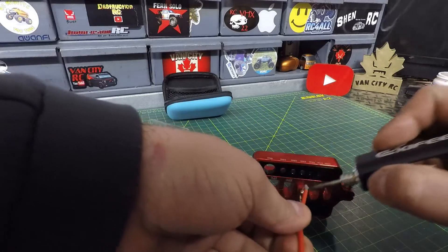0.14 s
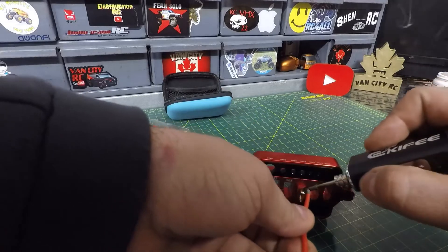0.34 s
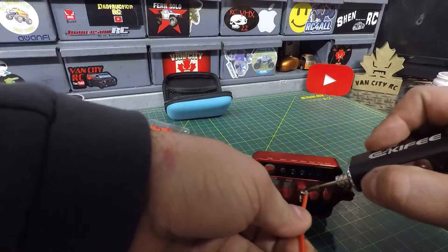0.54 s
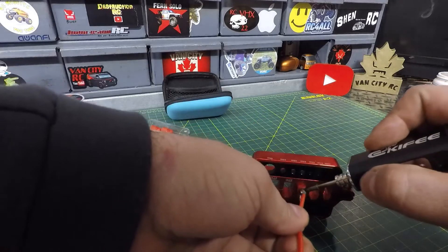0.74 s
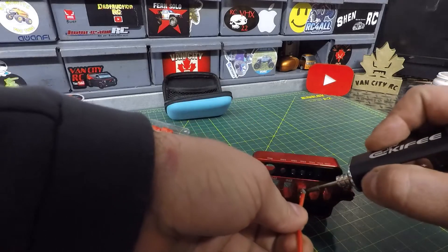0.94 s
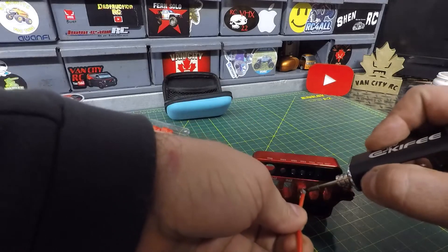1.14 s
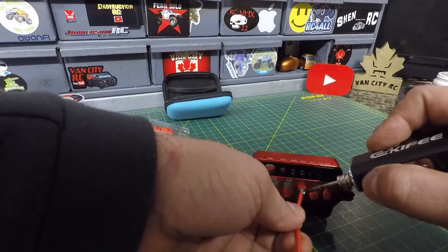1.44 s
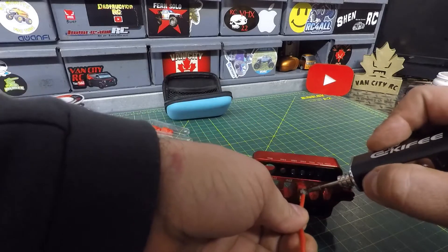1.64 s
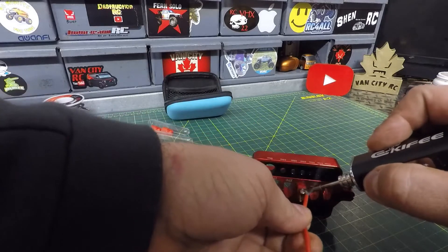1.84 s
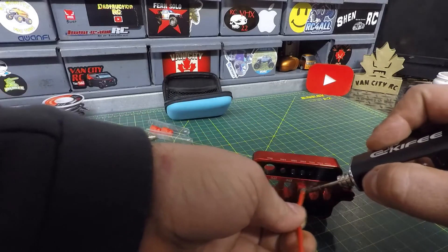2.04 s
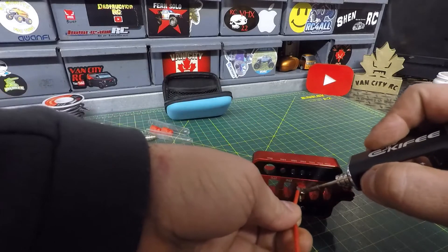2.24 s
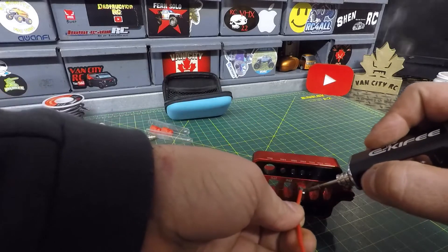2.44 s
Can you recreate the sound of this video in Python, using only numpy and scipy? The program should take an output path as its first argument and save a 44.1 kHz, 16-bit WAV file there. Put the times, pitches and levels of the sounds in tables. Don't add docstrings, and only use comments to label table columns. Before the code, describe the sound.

Dull, low bench thumps from a soldering iron tip nudging a joint, close and mostly right. Quiet hiss and a fading deep sway open; a strong knock with faint bright ticks comes at 0.2 seconds. Soft irregular bumps and trembling follow, with faint flux sizzle from 1.5 to 1.9. Firmer thumps land at 1.9 and 2.1; a last knock with a short rattly ring at 2.26 settles into quiet.

```python
import sys
import numpy as np
from scipy import signal
from scipy.fft import rfft, irfft
from scipy.io import wavfile
from scipy.ndimage import uniform_filter1d

SR = 44100
rng = np.random.default_rng(int(sys.argv[2]) if len(sys.argv) > 2 else 0)


def to_wav(s):
    ch = np.atleast_2d(s).T
    pcm = np.round(np.clip(ch, -1, 1) * 32767)
    wavfile.write(sys.argv[1], SR, pcm.astype(np.int16))


def volts_from_db(level):
    exponent = np.asarray(level, float) / 20
    return 10 ** exponent


N = 114660


def evened(x):
    return x / np.sqrt(np.mean(x ** 2) + 1e-20)


def read_curve(points, hz):
    f, value = np.transpose(points)
    return np.interp(np.log(hz + 1), np.log(f + 1), value)


def level(points):
    s, db = np.transpose(points)
    return volts_from_db(np.interp(np.arange(N) / SR, s, db, left=-200, right=-200))


def colour(x, gain):
    return irfft(rfft(x) * gain(np.fft.rfftfreq(N, 1 / SR)), N)


def add(mix, s, sound):
    part = mix[:, round(s * SR):][:, :sound.shape[1]]
    part += sound[:, :part.shape[1]]


# f/Hz, right level/dB, left level/dB, time to fall 60 dB t/s,
# right polarity, left polarity
BENCH_MODES = [(158.4, -6, -24.5, 0.28, 0.89, -1.04), (194.04, 2.5, -26, 0.22, 0.99, 0.9),
               (221, -15, -25, 0.074, -0.5, -1.58), (267.3, -21.5, -40.5, 0.26, 1, -0.93),
               (341, -14, -24.5, 0.041, 1, 1)]


def bench_ring(vary_db, rise_s, left_db=0):
    t = np.arange(SR // 2) / SR
    ring = np.zeros((2, len(t)))
    for (hz, right_db, left_mode_db, t60, right_sign, left_sign), v in zip(BENCH_MODES, vary_db):
        sign = np.array([[left_sign], [right_sign]])
        ports_db = np.array([[left_mode_db + left_db], [right_db]])
        ring += sign * volts_from_db(ports_db + v - 60 * t / t60) * np.sin(2 * np.pi * hz * t)
    return ring * np.sin(np.pi / 2 * np.minimum(t / rise_s, 1)) ** 2


# t/s, peak level/dB
NUDGES = [(0.202, -15), (0.329, -33), (0.364, -41), (0.416, -37.5), (0.518, -39), (0.593, -32),
          (0.667, -38), (0.74, -40.5), (0.776, -35), (0.847, -27.5), (0.988, -25), (1.054, -39),
          (1.091, -31), (1.13, -36), (1.2, -40), (1.261, -28.5), (1.351, -27), (1.429, -38), (1.463, -27.5),
          (1.561, -39), (1.609, -44), (1.65, -43), (1.714, -32), (1.804, -50), (1.912, -19), (1.969, -27.5),
          (2.056, -30), (2.103, -20.5), (2.186, -33.5), (2.222, -26.5)]
# t/s, level/dB
TREMOR = [(.17, -74), (.25, -65), (.5, -45), (.9, -47.5), (1.15, -42), (1.5, -46), (1.8, -44.5), (2.0, -49),
          (2.3, -52), (2.36, -65)]
# t/s, level/dB
RELEASE = [(0, 1.5), (2.315, 1), (2.335, -9.5), (2.6, 1)]
LEAD_S, PUSH_S = 0.01297, 0.019
BENCH_DB, VARY_DB = 6, 0.8
CHOKE_DB, CHOKE_S = -9.5, 0.012
LIFT_S, LIFT_DB, LIFT_LEFT_DB, LIFT_RISE_S = 2.26, -12.5, 5, 0.019
SHAKES_PER_S, LOW_CUT_HZ = 150, 148


def choke(ringing, start_s):
    t = np.arange(N) / SR
    return ringing * volts_from_db(CHOKE_DB * np.clip((t - start_s) / CHOKE_S, 0, 1))


def bench():
    out, even = np.zeros((2, N)), np.zeros(len(BENCH_MODES))
    variations = VARY_DB * rng.standard_normal((len(NUDGES), len(BENCH_MODES), 2))
    for (s, db), vary_db in zip(NUDGES, variations):
        out = choke(out, s - LEAD_S)
        add(out, s - LEAD_S, volts_from_db(db + BENCH_DB) * bench_ring(vary_db[:, :, None], PUSH_S))
    out = choke(out, LIFT_S)
    add(out, LIFT_S, volts_from_db(LIFT_DB) * bench_ring(even, LIFT_RISE_S, LIFT_LEFT_DB))

    ring = bench_ring(even, PUSH_S)
    ring = ring / np.linalg.norm(ring[1])
    shakes = rng.standard_normal(N) * (rng.random(N) < SHAKES_PER_S / SR)
    shakes = shakes * np.sqrt(SR / SHAKES_PER_S) * level(TREMOR)
    out += signal.oaconvolve(shakes[None], ring, axes=1)[:, :N]
    released = out * [np.ones(N), level(RELEASE)]
    return colour(released, lambda f: f ** 8 / (f ** 8 + LOW_CUT_HZ ** 8))


# f/Hz, level/dB, time to fall 60 dB t/s
JIG_MODES = [(400, -0.5, 0.061), (617, 2.5, 0.088), (693, 0.5, 0.094), (844, -0.5, 0.032),
             (1000, 3.5, 0.029), (1136, -2.5, 0.045), (1400, -13, 0.036)]
JIG_S, JIG_DB, JIG_RIGHT_DB, JIG_RISE_S = 2.264, -32, 5, 0.0048


def jig():
    out, t = np.zeros((2, N)), np.arange(SR // 4) / SR
    ring = sum(volts_from_db(db - 60 * t / t60) * np.sin(2 * np.pi * hz * t) for hz, db, t60 in JIG_MODES)
    ring = ring * np.minimum(t / JIG_RISE_S, 1)
    add(out, JIG_S, volts_from_db(JIG_DB) * ring * np.array([[1], [-volts_from_db(JIG_RIGHT_DB)]]))
    return out


# t/s, level/dB, f/Hz
TICKS = [(.19, -54, 5800), (.195, -53, 4160), (.199, -55, 5260), (.204, -55, 4600), (.633, -61, 4900),
         (0.646, -59, 6500), (.845, -63, 5000)]


def solder_ticks():
    out, t = np.zeros((2, N)), np.arange(SR // 4) / SR
    t60 = 0.019
    for s, db, hz in TICKS:
        add(out, s, volts_from_db(db - 60 * t / t60) * np.sin(2 * np.pi * hz * t) * np.ones((2, 1)))
    return out


# t/s, level/dB
FLUX = [(1.46, -81), (1.51, -62), (1.57, -60), (1.62, -55), (1.69, -57), (1.72, -64), (1.86, -60),
        (1.9, -59.5), (1.945, -72)]
# f/Hz, level/dB
FLUX_COLOUR = [(1500, -12), (3000, -9.5), (4500, -3.5), (6000, 0.5), (7500, -7.5), (10000, -4.5),
               (13000, -8.5), (15000, -11)]
# f/Hz, left minus right level/dB
FLUX_PAN = [(3000, -5), (5000, 2), (7500, 11.5), (10000, 0), (14000, 1)]
# f/Hz, likeness (0 to 1)
FLUX_SAME = [(2500, 0.5), (4200, .95), (5500, 0.46), (8000, 0.1), (14000, 0.1)]
# f/Hz, width f/Hz, level/dB
FLUX_PEAKS = [(7470, 180, 8), (8950, 120, 8.5), (5960, 200, 3), (12400, 500, 3)]
BUBBLES_PER_S, BUBBLE_SPREAD_DB, SPIT_DB, SPIT_S = 4000, 2.5, 0.5, 0.0049


def flux_peaks_db(f):
    return sum(db / (1 + ((f - hz) / width) ** 2) for hz, width, db in FLUX_PEAKS)


def flux():
    out = np.zeros((2, N))
    spit = uniform_filter1d(rng.standard_normal(N), round(SPIT_S * SR))
    spit = volts_from_db(SPIT_DB * evened(spit))
    pitches = np.geomspace(1500, 15000, num=24)
    for hz in pitches:
        t = np.arange(round(4.0 * SR / hz)) / SR
        bubble = np.hanning(len(t)) * np.sin(2 * np.pi * hz * t)
        bubble = bubble / np.linalg.norm(bubble)
        size = volts_from_db(BUBBLE_SPREAD_DB * np.minimum(rng.exponential(1, (3, N)), 4))
        size = size * (rng.random((3, N)) < BUBBLES_PER_S / len(pitches) / SR)
        same = np.clip(read_curve(FLUX_SAME, hz), 0, 1)
        bursts = spit * (np.sqrt(same) * size[0] + np.sqrt(1 - same) * size[1:])
        sizzle = signal.oaconvolve(bursts, bubble[None], axes=1)[:, :N]
        out += volts_from_db(read_curve(FLUX_COLOUR, hz)) * np.sqrt(hz) * sizzle
    pair = [colour(port, lambda f: volts_from_db(flux_peaks_db(f) + side * read_curve(FLUX_PAN, f) / 2))
            for port, side in zip(out, (1, -1))]
    return evened(np.array(pair)) * level(FLUX)


# t/s, level/dB
SWAY = [(0, -57), (.4, -61), (1.3, -69), (2.0, -72), (2.6, -75)]
SWAY_HZ, SWAY_WIDTH_HZ, SWAY_RIGHT_DB, SWAY_ROUGH = 25.5, 5, 1.5, 0.5


def sway():
    rough = rng.standard_normal((2, N))
    rough = colour(rough, lambda f: np.exp(-((f - SWAY_HZ) / SWAY_WIDTH_HZ) ** 2))
    wobble = np.sin(2 * np.pi * SWAY_HZ * np.arange(N) / SR) + SWAY_ROUGH * evened(rough)
    balance = volts_from_db(np.array([[-SWAY_RIGHT_DB / 2], [SWAY_RIGHT_DB / 2]]))
    return evened(wobble) * level(SWAY) * balance


# f/Hz, level/dB per Hz
AIR_MID = [(40, -19.5), (115, -19), (156, 0), (400, -10.5), (1400, -20), (7080, -29), (11000, -34.5),
           (14900, -40.5)]
# f/Hz, level/dB per Hz
AIR_SIDE = [(40, -36), (115, -27), (155, 0.5), (350, -4), (1100, -8), (4200, -32.5), (7080, -28),
            (14900, -40.5)]
MID_DB, SIDE_DB, PATCHY_DB = -54.5, -49.5, 1.0


def air():
    frames = N // 256 + 5
    a, b, c, d, patches = rng.standard_normal((frames, 513, 5)).T
    patches = uniform_filter1d(patches, size=12, axis=0)
    patches = evened(uniform_filter1d(patches, size=10, axis=1))
    slices = np.array([a + 1j * b, c + 1j * d]) * volts_from_db(PATCHY_DB * patches)
    white = signal.istft(slices, nperseg=1024, noverlap=768)[1][:, :N]

    def shaped(noise, curve, db):
        return volts_from_db(db) * evened(colour(noise, lambda f: volts_from_db(read_curve(curve, f)) * (f > 30)))

    mid = shaped(white[0], AIR_MID, MID_DB)
    side = shaped(white[1], AIR_SIDE, SIDE_DB)
    return np.array([mid + side, mid - side])


def scene():
    return bench() + jig() + solder_ticks() + flux() + sway() + air()


# f/Hz, width f/Hz, left level/dB, right level/dB
PORTS = [(7080, 510, 5.5, 6.5), (8890, 470, 2, 3.5), (10090, 1080, 3.5, 7)]


def port_cavities(dry):
    def boost_db(f, k):
        return sum(p[2 + k] / (1 + ((f - p[0]) / p[1]) ** 2) for p in PORTS)

    return np.array([colour(x, lambda f: volts_from_db(boost_db(f, k))) for k, x in enumerate(dry)])


def band_limit(x):
    return signal.sosfilt(signal.butter(12, 15040, fs=SR, output="sos"), x)


def record(dry):
    mix = port_cavities(dry)
    return band_limit(mix)


dry = scene()
out = record(dry)
to_wav(out)
```